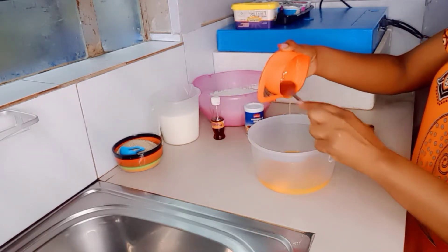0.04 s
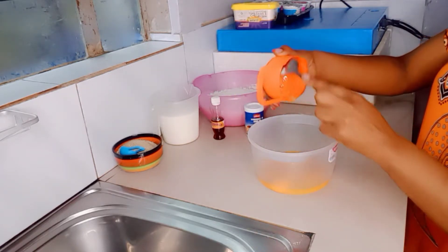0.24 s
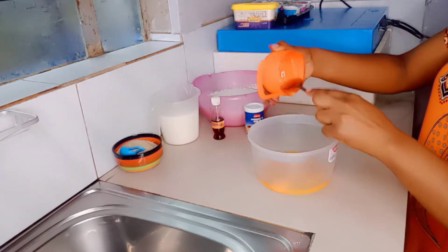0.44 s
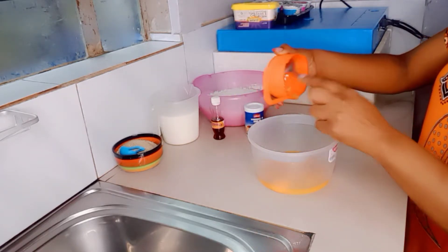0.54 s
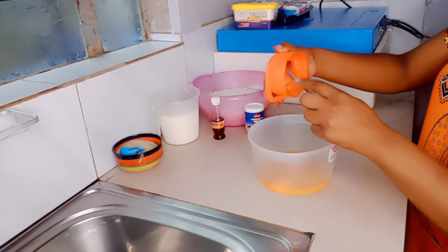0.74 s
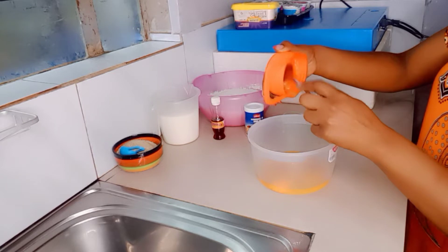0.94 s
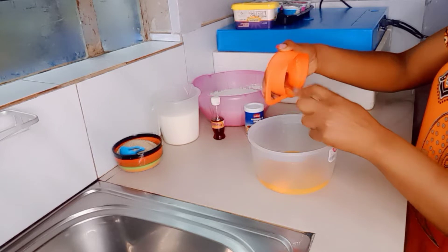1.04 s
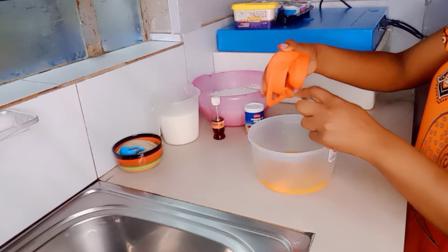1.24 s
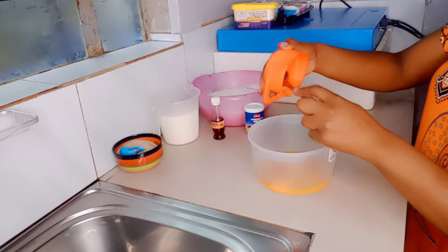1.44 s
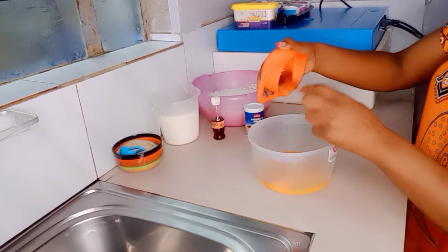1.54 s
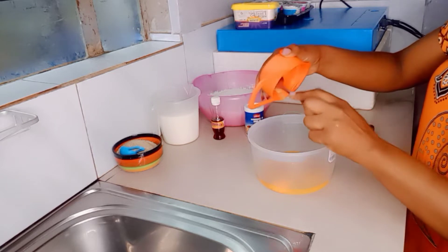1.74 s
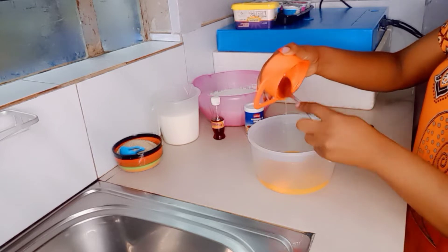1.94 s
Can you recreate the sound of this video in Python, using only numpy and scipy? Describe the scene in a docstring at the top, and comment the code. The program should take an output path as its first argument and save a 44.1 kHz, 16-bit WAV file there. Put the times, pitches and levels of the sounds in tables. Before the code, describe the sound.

A metal spoon knocks repeatedly inside a plastic cup in a small kitchen.

```python
"""A small tiled kitchen, where a metal spoon knocks margarine out of a hand-held plastic measuring cup.
About five blows a second ring the cup's hollow and walls, each with a gritty crack of contact.
Between them the spoon clacks on the rim and scrapes briefly along the wall in tiny stick-slip clicks.
The room rings on after every blow, over faint room noise and a low, wavering hum."""
import sys
import numpy as np
from scipy import signal
from scipy.fft import rfft, irfft
from scipy.io import wavfile

SR = 44100
rng = np.random.default_rng(int(sys.argv[2]) if len(sys.argv) > 2 else 0)


def dump_mix(stems):
    """Bounce the given channels to the path in sys.argv[1] as a 16-bit WAV at rate SR."""
    frames = np.atleast_2d(stems).T  # one column per channel
    limited = np.clip(frames, -1, 1)  # hard clip at full scale
    pcm = np.round(limited * 32767).astype(np.int16)
    wavfile.write(sys.argv[1], SR, pcm)


N = 88200
LEAD_S, RING_S = .1, .12  # pre-roll for a blow just before the start; length of one hit

# the spoon's modes: f/Hz, level/dB, t60/s
SPOON_MODES = [(2116, -4, 0.02), (2796, -1.5, 0.053), (3228, -8, .014), (3780, -11.5, 0.012),
               (4116, -14, 0.011), (6884, -10, 0.0077)]


def knocks():
    """The spoon hits the cup and rings its hollow and its walls, with a new pitch on every blow."""
    # t/s, level/dB, hollow f/Hz, hollow/dB, hollow t60/s, overtones/dB, thud f/Hz, thud/dB, crack/dB
    blows = [(-.045, -10.5, 1242, -3, 0.0098, 0, 587, 6, 3),
             (0.2616, -8, 964, -0.5, 0.018, -3, 570, 4.5, 9.5),
             (0.5331, 2.5, 1135, 0, 0.011, -2.5, 529, 0, 1.5),
             (0.751, -3, 1086, 0, 0.02, -3.5, 568, -0.5, 4),
             (.9590, -1.5, 1302, -1.5, 0.0091, 2, 653, -14.5, 1.5),
             (1.1592, -5.5, 1299, -2, 0.012, 3.5, 703, -2.5, 0),
             (1.3562, -4, 1306, 0, 0.0054, 1, 540, -4, 1.5),
             (1.6114, -1, 1274, -1.5, .013, 0, 600, -6, -0.5)]
    # the hollow's two close modes: f/hollow pitch, level/dB
    hollow_modes = [(0.961, -1.5), (1.09, -2.5)]
    # its overtones: f/hollow pitch, level/dB, t60/s
    overtones = [(1.87, -8, 0.0098), (2.09, -6, .01)]
    # low flexing of the cup: f/thud pitch, level/dB, t60/s
    flex_modes = [(.58, -17, 0.016), (1, -14.5, 0.053)]
    # high wall modes: f/Hz, level/dB, t60/s
    wall_modes = [(3552, -14, 0.0082), (3905, -13.5, 0.0096), (7530, -20, 0.015), (7790, -27, 0.013)]
    hollow, walls = track(), track()
    for at, db, hz, hollow_db, t60, overtone_db, thud_hz, thud_db, crack_db in blows:
        force = amp(db + 6)
        damped_modes = [(ratio, mode_db, t60) for ratio, mode_db in hollow_modes]
        add(hollow, at, force * amp(hollow_db) * ring(damped_modes, hz))
        thud = amp(thud_db) * ring(flex_modes, thud_hz)
        body = amp(overtone_db) * ring(overtones, hz) + thud + ring(wall_modes)
        add(walls, at, force * (body + amp(crack_db) * crack()))
    return hollow, walls


def clacks(gain_db=7):
    """Brighter hits ring spoon and rim together; one rebound gives a tiny tick."""
    # hits on the rim: t/s, level/dB, spoon/dB, rim/dB, crack/dB
    hits = [(.1950, -16.5, 0, 7, 5.5), (0.213, -15, -1.5, -4.5, 4.5), (0.513, -33, 1, 5, -3),
            (0.733, -14.5, -1, 7, 5), (1.5421, -0.5, 0.5, -2.5, -4), (1.5452, 0, -7, -10.5, 3.5),
            (1.555, -11.5, -8, -6, 7)]
    # the rim's modes: f/Hz, level/dB, t60/s
    rim_modes = [(287, -15, 0.03), (583, -12.5, 0.018), (763, -12, 0.0047), (1015, -14.5, 0.075),
                 (1490, -35, 0.06)]
    # the spoon's rebound: t/s, level/dB
    ticks = [(1.2150, -27.5)]
    # the tick's modes: f/Hz, level/dB, t60/s
    tick_modes = [(12100, -12, 0.013), (11100, -4.5, 0.0053), (7040, -4, 0.0058)]
    out = track()
    for at, db, spoon_db, rim_db, crack_db in hits:
        ringing = amp(spoon_db) * ring(SPOON_MODES) + amp(rim_db) * ring(rim_modes)
        add(out, at, amp(gain_db + db) * (ringing + amp(crack_db) * crack()))
    for at, db in ticks:
        add(out, at, amp(gain_db + db) * ring(tick_modes))
    return out


def crack():
    """A click and a few milliseconds of grit as metal meets plastic."""
    # spectrum of the contact: f/Hz, density/dB
    colour = [(100, -73), (400, 10), (1500, 6), (3800, 0.5), (5000, -8.5), (7400, 6.5), (9500, -7),
              (13000, -9.5), (15300, -4.5)]
    t = np.arange(int(RING_S * SR)) / SR
    grit = noise(colour, len(t)) * fade(t, t60=0.012) * rise(t, build_s=0.00057)
    contact = unit(grit) + amp(5) * unit(click(colour, len(t)))
    return amp(-20) * highpass(contact, hz=250)


def scrapes(slips_per_s=1900, hiss_db=3.5):
    """Dense stick-slip clicks ring the spoon as it drags along the wall."""
    # drags: t/s, length/s, level/dB
    drags = [(0.199, 0.054, -44), (1.846, 0.11, -60.5)]
    out = track()
    for at, length, db in drags:
        size = int(length * SR)
        slips = (rng.random(N) < slips_per_s / SR) * rng.standard_normal(N)
        stroke = slips[:size] * signal.windows.tukey(size, .5)
        slip_sound = unit(ring(SPOON_MODES)) + amp(hiss_db) * unit(crack())
        rub = signal.fftconvolve(stroke, slip_sound)
        add(out, at, amp(db) * np.sqrt(size) * unit(rub))
    return out


def kitchen(x, room_db=2.5, build_s=0.00033):
    """Direct sound, first echoes, and a diffuse tail that builds up and dies sooner in the treble."""
    # decay of the tail: f/Hz, t60/s
    decay = [(150, 0.93), (400, 0.47), (1200, 0.4739), (3000, 0.47), (7500, 0.49), (15000, 0.33)]
    # colour of the tail: f/Hz, level/dB
    colour = [(100, 12.5), (300, -6), (550, -1), (800, 1.5), (1200, 1.5), (2500, -4), (5000, 0), (8000, -4),
              (15000, -0.5)]
    # first echoes off counter and wall: delay/s, gain
    echoes = [(.0009, 0.15), (.0026, 0.23), (.0075, .12)]
    t = np.arange(SR) / SR
    hz = np.linspace(0, SR / 2, SR // 2 + 1)
    spectrum = rfft(rng.standard_normal(SR))
    edges_hz = np.geomspace(100, 17000, 37)
    response = np.zeros(SR)
    for lo, hi in zip(edges_hz[:-1], edges_hz[1:]):
        centre = np.sqrt(lo * hi)
        band = irfft(spectrum * ((hz >= lo) & (hz < hi)), SR)
        tail = unit(band * fade(t, lookup(decay, centre)) * rise(t, build_s))
        response += amp(room_db + lookup(colour, centre)) * np.sqrt(2 * (hi - lo) / SR) * tail
    # dense reflections off hands, cup and bowl: only short waves bounce off small things
    scatter = rng.standard_normal(SR) * fade(t, t60=0.068)
    response += 0.47 * unit(highpass(scatter, hz=2860))
    response[0] += 1  # direct sound
    for delay, gain in echoes:
        response[int(delay * SR)] += gain
    return signal.fftconvolve(x, response)[int(LEAD_S * SR):][:N]


def room_tone():
    """A bed of faint noise and two low hums that waver and swell."""
    # spectrum of the bed: f/Hz, density/dB
    colour = [(25, -24), (45, -34), (66, 4), (97, -11.5), (122, -0.5), (148, -18.5), (250, 8), (500, -4),
              (1200, -9), (3500, -16), (5000, -32.5), (7500, -33), (10000, -36), (15500, -37)]
    # the hums: f/Hz, trim/dB, phase wander/rad
    hums = [(66, -1, 1), (176.2, -1.5, 0.86)]
    # their swells: t/s, deep hum/dB, upper hum/dB
    hum_levels = [(0, -67, -65), (.07, -57.5, -49), (.3, -65, -74), (.48, -68, -69), (.54, -67, -54.5),
                  (.94, -55.5, -49), (1.05, -63, -62), (1.118, -51, -54.5), (1.28, -63, -62),
                  (1.39, -53, -59.5), (1.5, -47, -47), (1.58, -65, -60.5), (1.65, -54, -54),
                  (1.72, -66, -52.5), (1.8, -62.5, -50.5), (2, -61, -60.5)]
    t = np.arange(N) / SR
    at, *swells = np.array(hum_levels).T
    out = amp(-51) * noise(colour, N)
    for (hz, db, wander), swell in zip(hums, swells):
        waver = noise([(8, 0), (30, -40), (100, -120)], N)  # slow drift, mostly below 8 Hz
        rms = amp(db + np.interp(t, at, swell))
        out += rms * np.sqrt(2) * np.sin(2 * np.pi * hz * t + wander * waver)
    return out


def ring(modes, pitch=1):
    """Struck modes of alternating sign; a small body radiates little below each mode."""
    t = np.arange(int(RING_S * SR)) / SR
    out = np.zeros(len(t))
    for k, (f, db, t60) in enumerate(modes):
        mode = np.sin(2 * np.pi * f * pitch * t) * fade(t, t60)
        out += (-1) ** k * amp(db) * unit(highpass(mode, hz=0.48 * f * pitch))
    return out


def click(colour, size):
    """One minimum-phase click with the given spectrum."""
    hz = np.linspace(0, SR / 2, size // 2 + 1)
    cepstrum = irfft(np.log(amp(lookup(colour, hz))), size)
    cepstrum[1:size // 2] *= 2
    cepstrum[size // 2 + 1:] = 0
    return irfft(np.exp(rfft(cepstrum)), size)


def noise(colour, size):
    """Coloured noise of rms 1."""
    hz = np.linspace(0, SR / 2, size // 2 + 1)
    x = irfft(rfft(rng.standard_normal(size)) * amp(lookup(colour, hz)), size)
    return x / x.std()


def lookup(points, hz):
    """Read a table on a log-frequency axis."""
    f, values = np.array(points, float).T
    return np.interp(np.log(np.maximum(hz, 1)), np.log(f), values)


def highpass(x, hz):
    return signal.sosfilt(signal.butter(2, min(hz, .45 * SR), "high", fs=SR, output="sos"), x)


def rise(t, build_s):
    return 1 - np.exp(-t / build_s)


def fade(t, t60):
    return np.exp(-np.log(1000) * t / np.maximum(t60, 1e-4))


def amp(db):
    return 10 ** (np.asarray(db) / 20)


def unit(x):
    """Scale to unit energy."""
    return x / np.sqrt(np.sum(x ** 2) + 1e-18)


def track():
    return np.zeros(N + int(LEAD_S * SR))


def add(out, at_s, x):
    """Mix a sound into a track at its time."""
    i = max(int((at_s + LEAD_S) * SR), 0)
    out[i:i + len(x)] += x[:max(len(out) - i, 0)]


def scene():
    """Cup and spoon in the kitchen, in mono; the hollow is heard mostly by way of the room."""
    hollow, walls = knocks()
    cup = kitchen(hollow, room_db=5.5, build_s=0.0051) + kitchen(walls)
    spoon = kitchen(clacks() + scrapes())
    return (cup + spoon + room_tone())[None]


def record(dry, top_hz=15700):
    """A steep low-pass takes the air off the top."""
    return signal.sosfilt(signal.ellip(10, .2, 70, top_hz, fs=SR, output="sos"), dry)


dry = scene()
out = record(dry)
dump_mix(out)
```